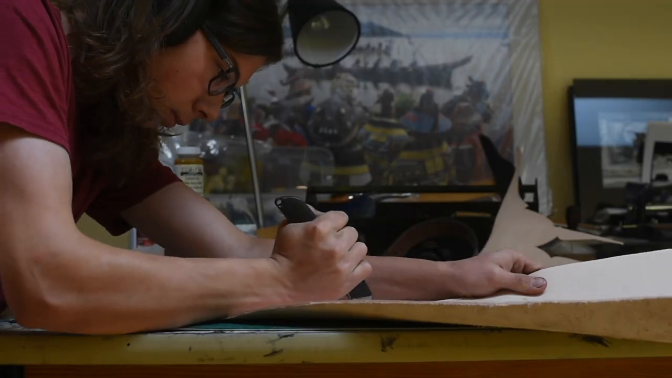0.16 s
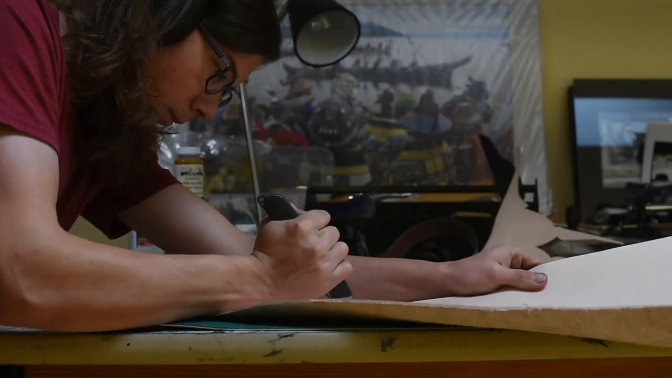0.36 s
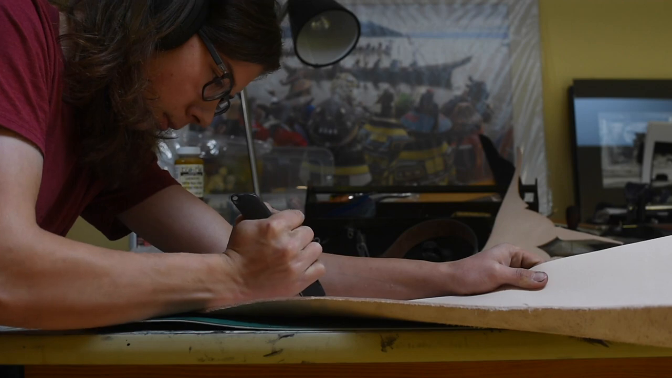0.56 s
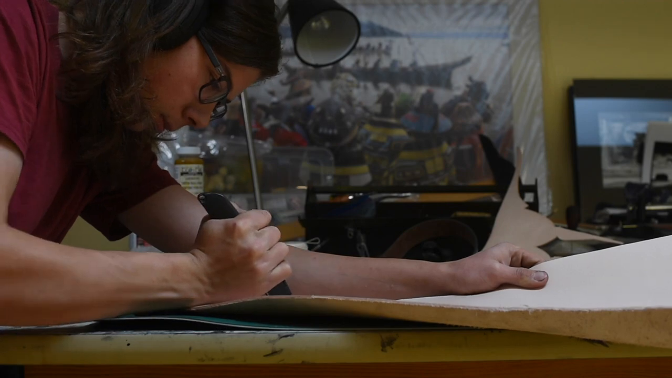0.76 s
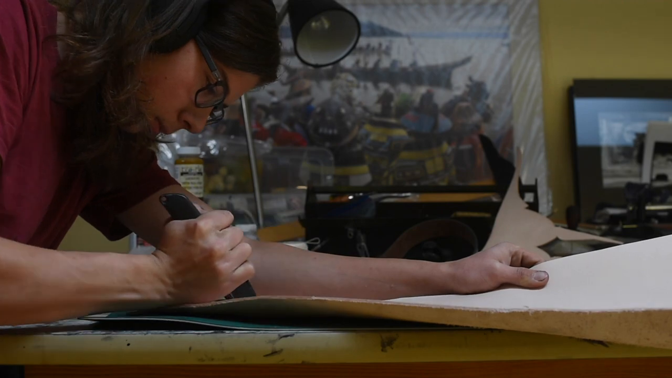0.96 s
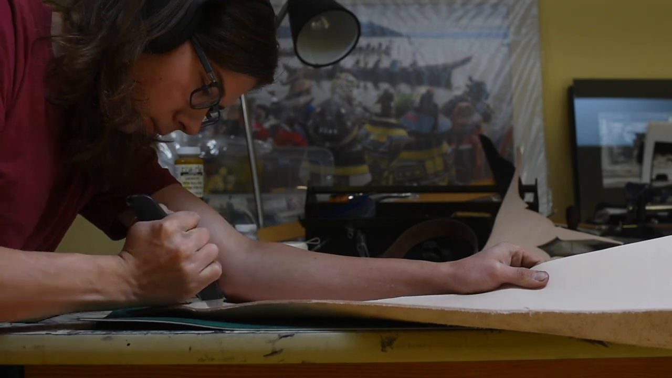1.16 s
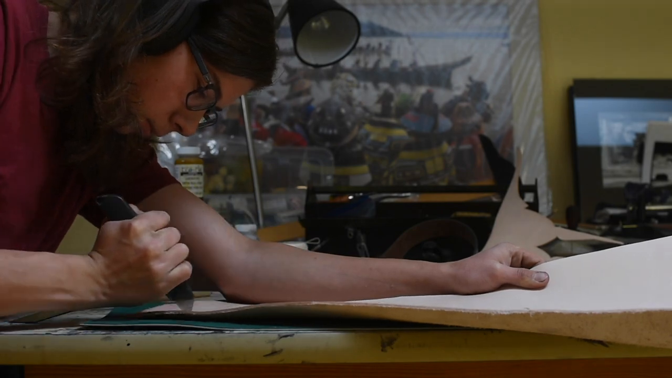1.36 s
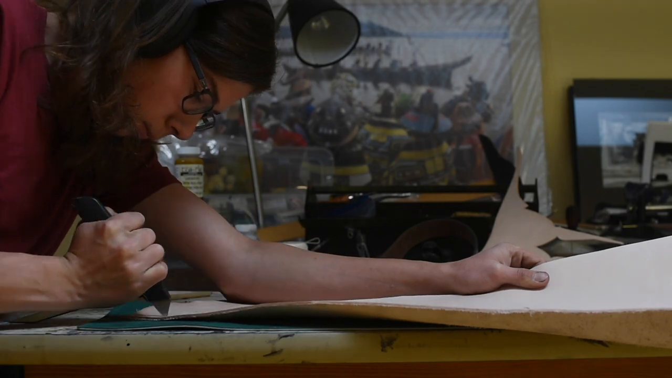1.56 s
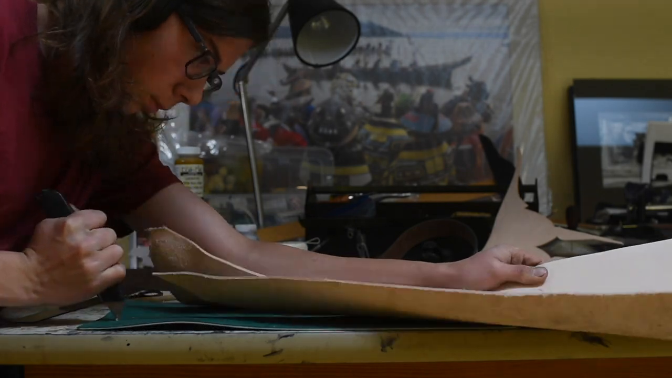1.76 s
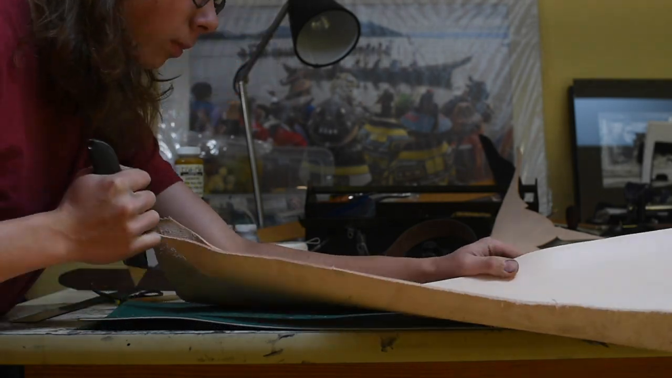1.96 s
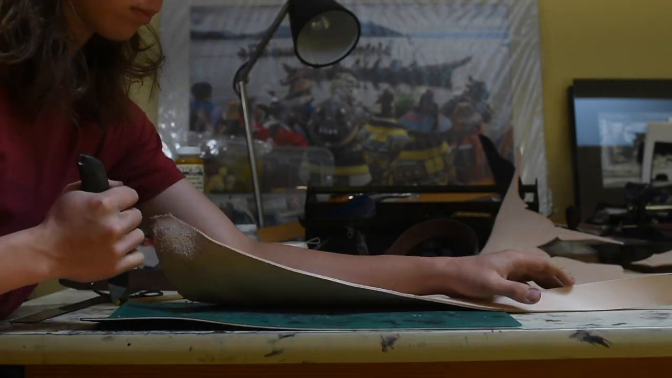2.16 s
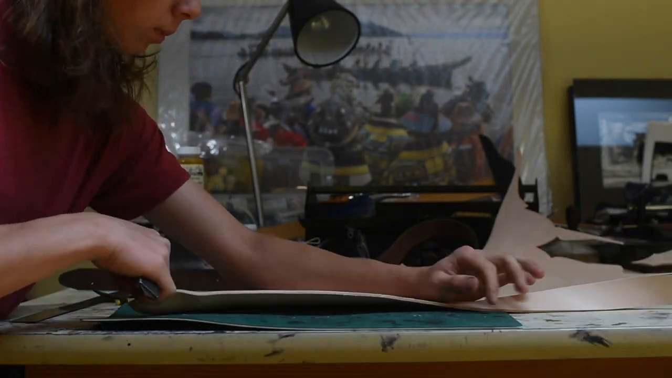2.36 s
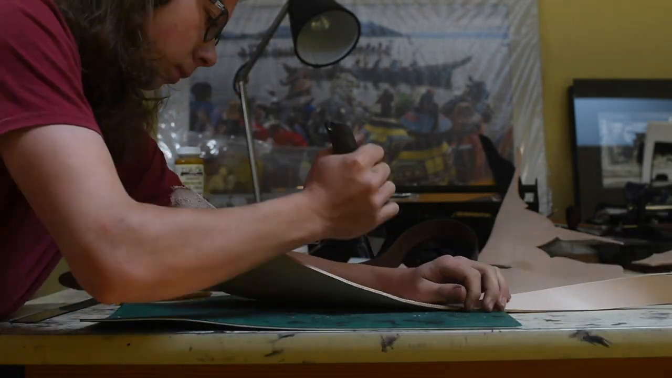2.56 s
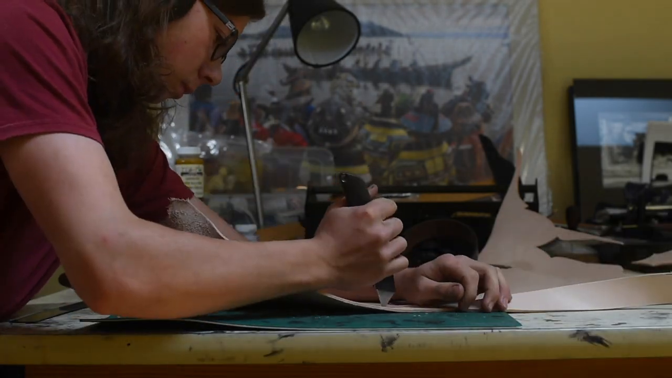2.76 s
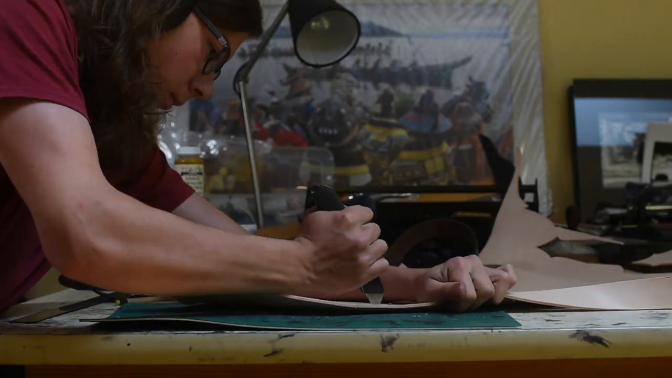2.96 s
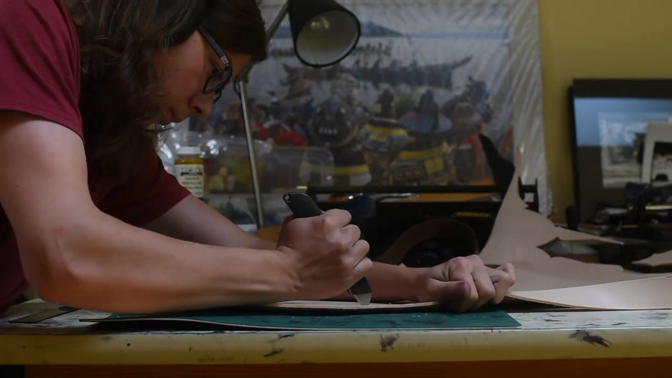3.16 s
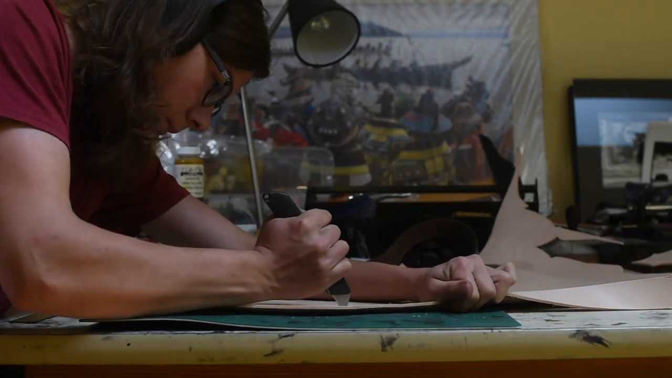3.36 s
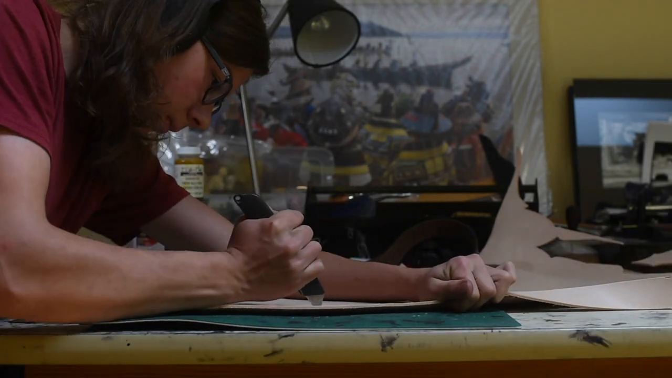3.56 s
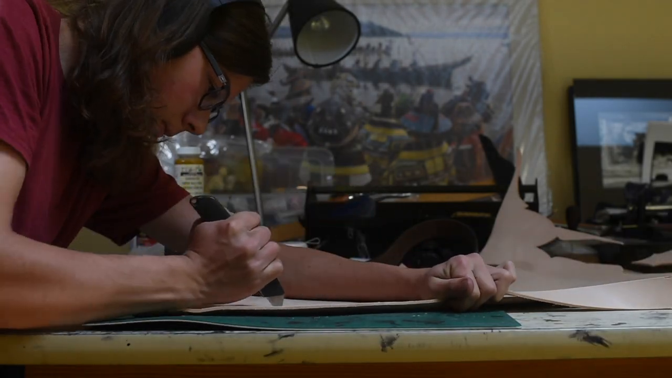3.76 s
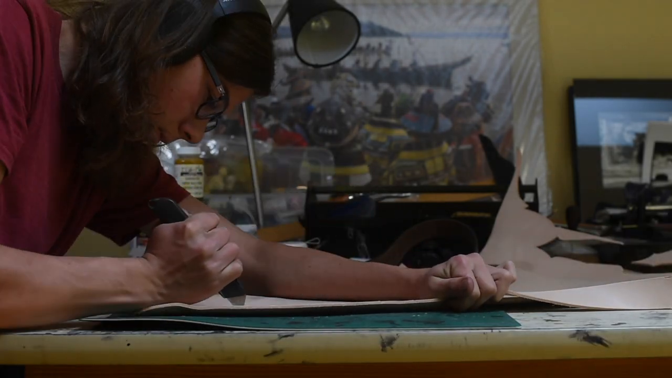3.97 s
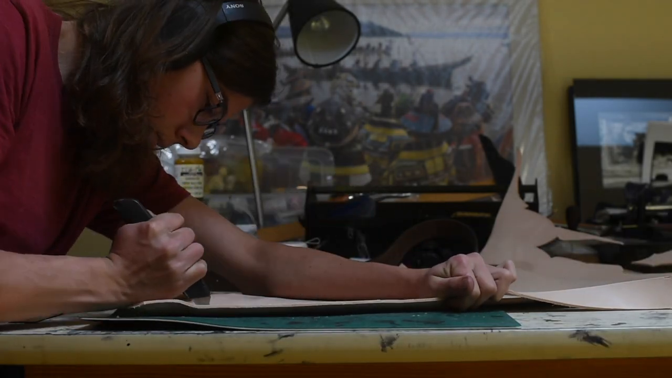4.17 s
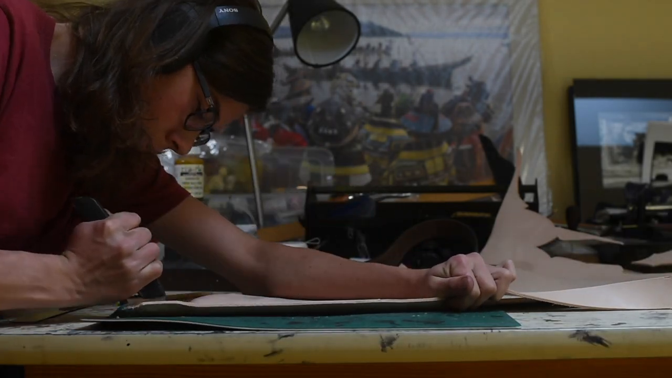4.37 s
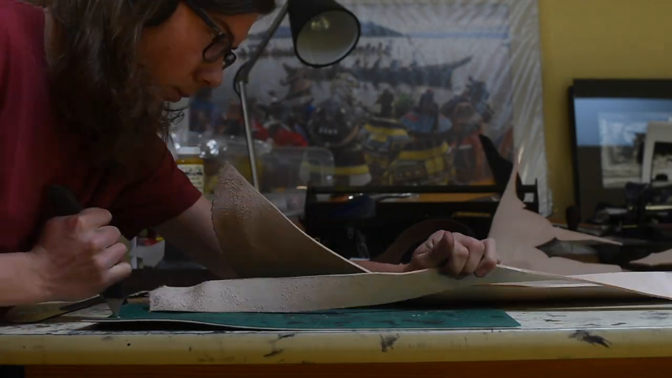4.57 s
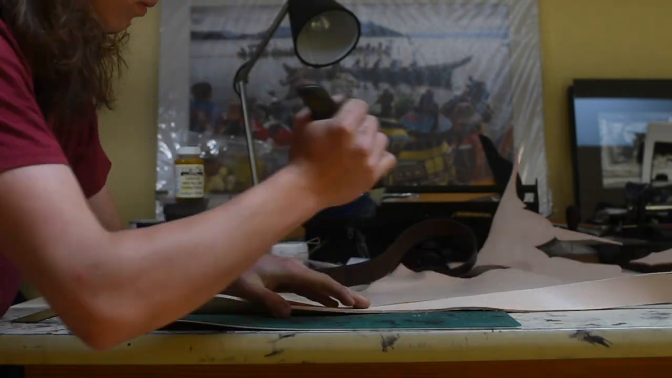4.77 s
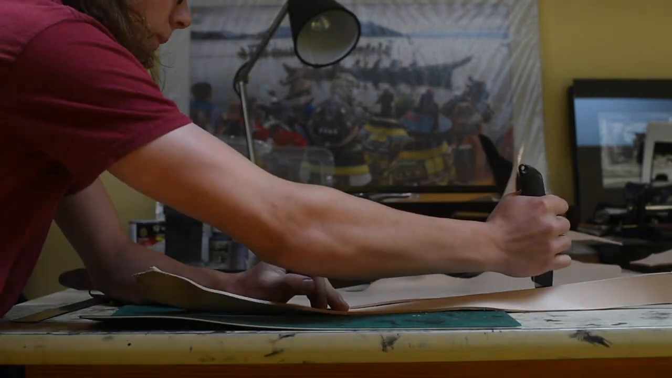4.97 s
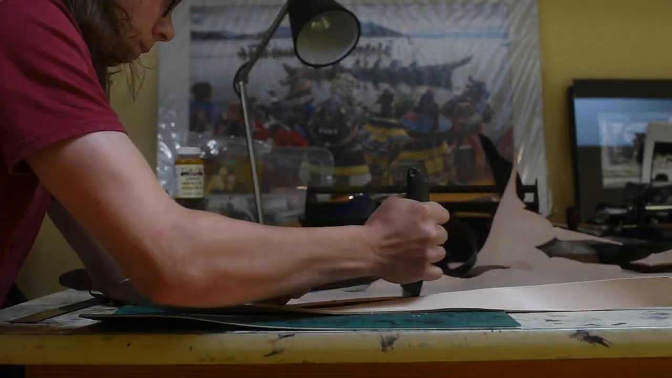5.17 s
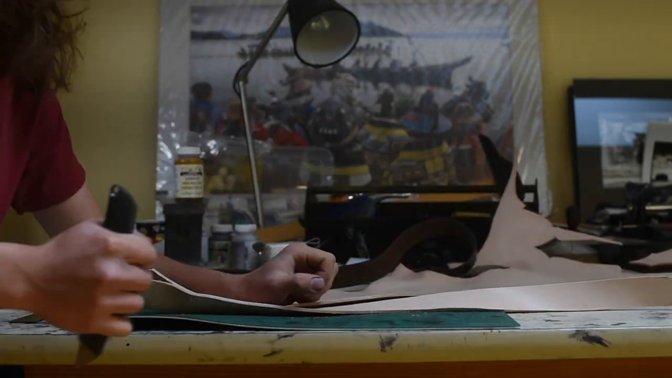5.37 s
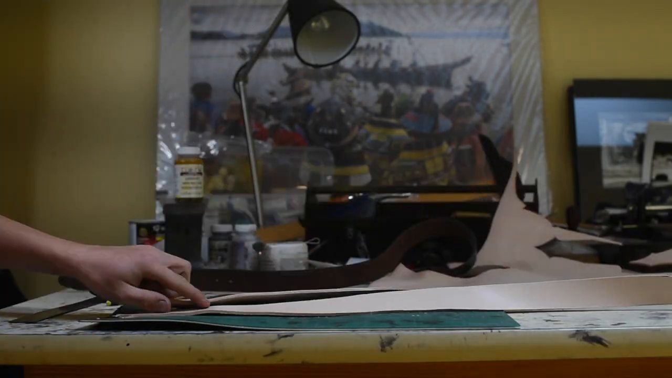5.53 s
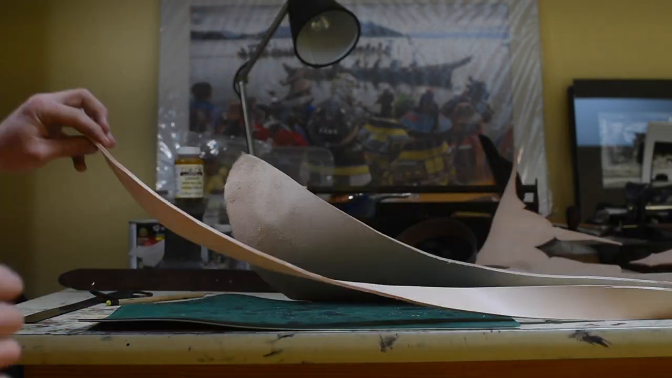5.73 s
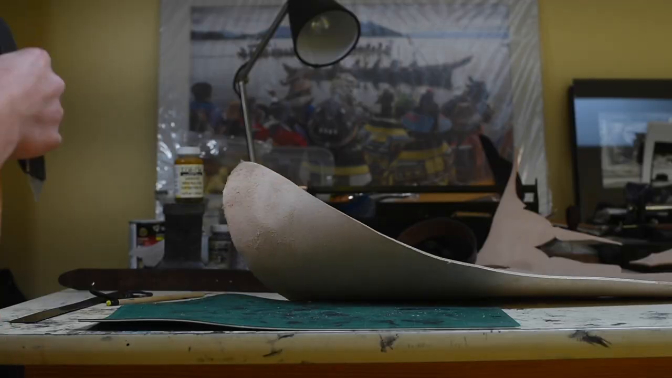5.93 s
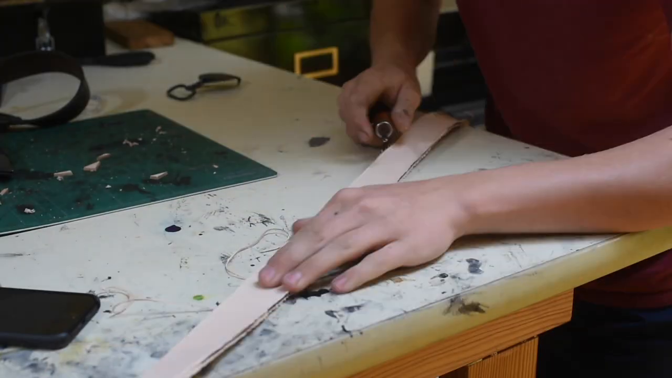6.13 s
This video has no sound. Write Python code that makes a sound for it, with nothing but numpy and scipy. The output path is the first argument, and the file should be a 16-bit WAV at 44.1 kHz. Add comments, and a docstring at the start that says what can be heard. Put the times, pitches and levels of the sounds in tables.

```python
"""Cutting hide on a workbench

A knife is dragged twice through a thick hide; fibres snap in rasping pulls that stick, slip and stall.
Between the cuts the freed strip slaps down and shakes the bench and its tools; afterwards the hide is
shifted and lifted. A fan hums in the small workshop. It ends at a quieter, closer spot with light ticks."""
import sys
import numpy as np
from scipy import signal
from scipy.fft import rfft, irfft, next_fast_len
from scipy.io import wavfile
from scipy.ndimage import uniform_filter1d

SR = 44100
rng = np.random.default_rng(int(sys.argv[2]) if len(sys.argv) > 2 else 0)


def generate_wav(signal):
    """Clip the signal to [-1, 1] and save it as 16-bit WAV at the path in sys.argv[1]."""
    frames = np.transpose(np.atleast_2d(signal))
    scaled = np.clip(frames, -1, 1) * 32767
    pcm = np.round(scaled).astype(np.int16)
    wavfile.write(sys.argv[1], SR, pcm)


N = 277830
TIME = np.arange(N) / SR
MOVE_S = 6.116  # move to the closer spot


def amp(db):
    """Decibels to gain."""
    return 10 ** (np.asarray(db) / 20)


def unit(x):
    """Scales to rms 1."""
    return x / np.sqrt(np.mean(x ** 2) + 1e-20)


def curve(points, hz):
    """Joins (Hz, value) points on a log-frequency axis."""
    f, value = np.transpose(points)
    return np.interp(np.log(hz + 1), np.log(f + 1), value)


def peaks_db(modes, f):
    """Boost from resonances given as (Hz, width Hz, dB)."""
    return sum(db / (1 + (2 * (f - hz) / width) ** 2) for hz, width, db in modes)


def colour(x, db_at):
    """Filters x by a function Hz -> dB; rms 1."""
    return unit(irfft(rfft(x) * amp(db_at(np.fft.rfftfreq(len(x), 1 / SR))), len(x)))


def add(mix, start_s, sound):
    """Mixes a sound in at start_s."""
    part = mix[max(round(start_s * SR), 0):][:len(sound)]
    part += sound[:len(part)]


def bell(t, centre, length):
    """Power of a smooth swell."""
    return np.exp(-np.minimum((2 * (t - centre) / length) ** 2, 60))


def span(start_s, end_s, ramp_samples):
    """Gate with linear ramps."""
    return uniform_filter1d(1. * ((TIME > start_s) & (TIME < end_s)), size=ramp_samples)


def wander(rate_hz):
    """Random drift below rate_hz, rms about 1."""
    knots = colour(rng.standard_normal(4096), lambda f: -10 * np.log10(1 + (f * 4096 / N / rate_hz) ** 4))
    return np.interp(TIME, np.linspace(0, N / SR, len(knots)), knots)


def fibres(size, spread_db):
    """Dense tiny snaps of uneven strength."""
    return rng.standard_normal(size) * amp(spread_db * np.minimum(rng.exponential(1, size), 5))


# Air of the workshop and of the closer spot. Each row: frequency in Hz, relative density in dB.
WORKSHOP_AIR = [(25, -48), (60, -14.5), (120, -21), (170, -10.5), (250, -6), (330, -10), (500, -12),
                (700, -7.5), (1000, -11), (2000, -15), (5000, -18.5), (10000, -23.5), (16000, -27)]
CLOSE_AIR = [(40, -12), (150, -11), (500, -8), (1200, -2), (2500, -5), (5000, -4), (10000, -7),
             (16000, -13)]
# Fan hum, and whine at the closer spot. Each row: frequency in Hz, level in dB.
FAN_HUM = [(237, -82), (479, -73), (546, -84.5), (958, -94.5)]
CLOSE_WHINE = [(1200, -88), (1830, -87), (2401, -83.5)]


def background(during, air, lines, air_db):
    """Soft hiss with slightly wavering tones."""
    t = TIME[during]
    hiss = colour(rng.standard_normal(next_fast_len(len(t))), lambda f: curve(air, f))[:len(t)]
    drift_rad = 0.23 * wander(rate_hz=3.3)[during]
    tones = sum(amp(db) * np.sqrt(2) * np.sin(2 * np.pi * hz * t + drift_rad) for hz, db in lines)
    return amp(air_db) * hiss + tones * amp(1.3 * wander(rate_hz=9.8)[during])


# Hollow ring of the stiff hide. Each row: frequency in Hz, width in Hz, boost in dB.
SHEET_MODES = [(821, 56, 4), (1007, 73, -0.5), (3790, 680, 1)]


def contact(size, thump_db, dull_db):
    """Grainy noise of hide on the thumping bench top; a flatter contact has more body and less edge."""
    body_db = 0.47 * dull_db - 3.5
    edge_db = -0.65 * dull_db - 0.6
    shape = [(30, thump_db - 31), (70, thump_db - 18), (115, thump_db - 27), (190, thump_db),
             (300, thump_db - 2), (430, thump_db / 2 + body_db / 2 - 6.5),
             (600, body_db - 1.5), (980, body_db + 3), (1500, -1.5), (2400, -0.3),
             (3500, 1 + edge_db / 4), (6000, edge_db + 2), (9500, edge_db - 4.5), (16000, edge_db - 8)]
    return colour(fibres(size, spread_db=2.5), lambda f: curve(shape, f) + peaks_db(SHEET_MODES, f))


# Hands on the loose hide. Each row: start in seconds, end in seconds, rustle level in dB.
HANDLING = [(0, 0.032, -60.5), (1.825, 2.154, -71.5), (2.382, 2.95, -79), (4.686, 5.92, -73)]


def handling(knocks_per_s=7):
    """The loose hide rustles faintly, with tiny knocks at random."""
    out = np.zeros(N)
    rustle = contact(N, thump_db=2.5, dull_db=5) * amp(wander(rate_hz=9.3))
    for start, end, db in HANDLING:
        out += amp(db) * rustle * span(start, end, ramp_samples=1500)
        for chance, when, strength, dull in rng.random((24, 4)):
            if chance < knocks_per_s * (end - start) / 24:
                knock_s = start + when * (end - start)
                add(out, *tap(knock_s, db + 7.5 + 5 * strength, length_s=0.0026, dull_db=24 * dull - 8))
    return out


# Blade in the hide. Each row: start in seconds, end in seconds.
IN_HIDE = [(0.28, 1.78), (3.27, 4.52)]
# Pulls from stall to stall. Each row: start in seconds, length in seconds, force in dB.
PULLS = [(0.176, 0.042, -55.5), (0.285, 0.066, -47.5), (0.352, 0.045, -50), (0.432, 0.027, -48.5),
         (0.464, 0.078, -44), (0.561, 0.057, -46.5), (0.651, 0.14, -46), (0.821, 0.049, -47.5),
         (0.879, 0.24, -47), (1.164, 0.079, -47.5), (1.259, 0.16, -49), (1.427, 0.096, -48),
         (1.56, 0.075, -48.5), (1.67, 0.12, -46.5), (3.118, 0.14, -55.5), (3.278, 0.065, -47.5),
         (3.408, 0.12, -48), (3.54, 0.08, -46.5), (3.638, 0.16, -46.5), (3.811, 0.13, -48),
         (3.957, 0.067, -51), (4.042, 0.2, -49.5), (4.252, 0.11, -45.5), (4.408, 0.12, -43)]
# Tough spots. Each row: centre in seconds, force in dB, length in seconds.
SNAGS = [(0.106, -40, 0.027), (0.839, -41, 0.022), (3.714, -43, 0.0075), (4.381, -38, 0.02),
         (4.506, -39, 0.012)]


def blade_force(creep_db=-58, attack_s=0.0034, release_s=0.0036, sag_db_per_s=-5.5):
    """Each pull bites, sticks and slips, tires and stalls; the blade creeps on and bursts through snags."""
    power = amp(creep_db) ** 2 * sum(span(start, end, ramp_samples=800) for start, end in IN_HIDE)
    slip_hz = 31.6 * np.exp(0.4 * wander(rate_hz=25))
    uneven_db = 0.72 * wander(rate_hz=16)
    t = np.arange(SR // 2) / SR
    for start, length, db in PULLS:
        here = slice(round(start * SR), round(start * SR) + len(t))
        slip_db = 1.1 * np.sin(2 * np.pi * np.cumsum(slip_hz[here]) / SR)
        gate = (1 - np.exp(-t / attack_s)) * np.exp(-np.maximum(t - length, 0) / release_s)
        add(power, start, (gate * amp(db + sag_db_per_s * t + slip_db + uneven_db[here])) ** 2)
    snags = sum(amp(db) ** 2 * bell(TIME, centre, length) for centre, db, length in SNAGS)
    return np.sqrt(abs(power + snags))


# The two cuts. Each row: start in seconds, end in seconds.
CUT_TIMES = [(0, 1.9), (3.0, 4.65)]
# Rasp spectrum of each cut. Each row: frequency in Hz, relative density in dB.
FIRST_RASP = [(60, -47), (115, -45), (175, -6.5), (400, -14), (520, -10.5), (800, -1.5), (1150, -9.5),
              (1900, 6), (3100, -4), (4500, 1), (7500, -2), (11500, -5), (16000, -9)]
SECOND_RASP = [(60, -44), (115, -35), (175, 0.5), (400, -4.5), (600, 4), (800, 5), (1300, -2.5),
               (2000, 0.5), (2500, -3.5), (4500, -1), (6500, -2), (11000, -3), (16000, -7.5)]
# Colour along each cut. Each row: time in seconds, body gain in dB, fizz gain in dB.
FIRST_TONE = [(0.1, -1.5, -5.5), (0.33, 2, -2), (0.7, 3.5, -1.5), (0.85, 7, 2.5), (1.2, 7, 3),
              (1.55, 5, -0.5), (1.77, 3, -1)]
SECOND_TONE = [(3.141, -10, -7), (3.45, -7.5, -6), (3.75, -2.5, 1), (4.15, -1.5, 2), (4.35, -7.5, -6.5),
               (4.52, -4.5, -5.5)]
# Resonances of blade and hide. Each row: strongest moment in seconds, spread in seconds,
# frequency in Hz, width in Hz, relative level in dB.
BLADE_MODES = [(0.6, 1.03, 3610, 63, -7.5), (1.15, 1.26, 1655, 32, -6.5), (1.16, 0.57, 2750, 200, -10.5),
               (0.77, 0.2, 3700, 92, -5.5), (0.42, 0.43, 4640, 170, -21), (3.83, 0.35, 2980, 100, -7.5),
               (3.86, 0.22, 3400, 50, -18), (4.07, 0.29, 1830, 320, -14), (4.25, 0.18, 1140, 150, -15.5),
               (4.47, 0.12, 5800, 500, -14)]


def cut(start, end, force, spectrum, tone, gain_db, tough_per_s=110, tough_db=21.5):
    """Fibres part in surges, tough ones tick; resonances of blade and hide change along the cut."""
    during = (TIME >= start) & (TIME < end)
    t = TIME[during]
    force = force[during] * amp(0.86 * wander(rate_hz=250)[during])  # small catches
    size = next_fast_len(len(t))
    f = np.fft.rfftfreq(size, 1 / SR)
    ticks = amp(tough_db) * rng.standard_normal(size) * (rng.random(size) < tough_per_s / SR)
    snaps = rfft(fibres(size, spread_db=2.0) + ticks)
    rasp = snaps * amp(curve(spectrum, f))
    low = 1 / (1 + (f / 1300) ** 4)
    high = 1 - 1 / (1 + (f / 5000) ** 4)
    bands = irfft(rasp * np.array([low, 1 - low - high, high]), size)[:, :len(t)] / irfft(rasp, size).std()
    # The hide is uneven, so the colour keeps shifting.
    body, middle, fizz = [band * amp(2.2 * wander(rate_hz=26)[during]) for band in bands]
    tone_s, body_db, fizz_db = np.transpose(tone)
    bite = (force / amp(-39.0) + 0.044) ** 0.52  # a harder surge is brighter
    sound = body * amp(np.interp(t, tone_s, body_db)) + middle
    sound += fizz * amp(np.interp(t, tone_s, fizz_db)) * bite
    for centre, length, hz, width, db in BLADE_MODES:
        if start < centre < end:
            note = unit(irfft(snaps / (1 + ((f - hz) / width) ** 2), size))[:len(t)]
            grip_db = 2.0 * wander(rate_hz=56)[during] - 1.2  # the blade's grip varies
            sound += amp(db + grip_db) * np.sqrt(bell(t, centre, length)) * note
    return start, amp(gain_db) * force * sound


# Rips and creaks. Each row: centre in seconds, level in dB, rise and decay time in seconds.
RIPS = [(0.198, -54.5, 0.022), (1.772, -30, 0.0033), (2.141, -50, 0.0079), (6.0, -44.5, 0.0027)]


def rip(centre_s, db, length_s):
    """Fibres at the cut edge give way in a short swell."""
    t = np.arange(-4096, 4096) / SR
    shape = [(60, -48.5), (200, -17), (900, -17.5), (1600, -7.5), (2400, 2.0), (3700, -10.5),
             (4800, -14), (9000, -21.5), (16000, -25.5)]
    tearing = colour(fibres(len(t), spread_db=-1.0), lambda f: curve(shape, f))
    return centre_s + t[0], amp(db) * tearing * np.exp(-abs(t) / length_s)


# Light knocks. Each row: start in seconds, relative level in dB, decay time in seconds, dullness in dB.
TAPS = [(1.915, -54.5, 0.0078, 5), (2.041, -53.5, 0.0075, 17.5), (2.334, -43, 0.0056, 19),
        (2.414, -54, 0.0055, 13), (2.466, -53, 0.0038, 2), (4.708, -57.5, 0.017, 8),
        (4.887, -53, 0.0025, 4), (4.927, -47, 0.0036, 8), (4.971, -54.5, 0.0085, 25),
        (5.103, -46.5, 0.005, 24), (5.137, -51.5, 0.0037, -3), (5.429, -46.5, 0.015, 8.5),
        (5.768, -49, 0.0083, 12), (6.138, -47.5, 0.0019, -15), (6.244, -49.5, 0.0013, -15)]


def tap(start_s, db, length_s, dull_db):
    """Knife or hide knocks on the bench; a longer contact also starts more softly."""
    t = np.arange(4096) / SR
    envelope = np.exp(-t / length_s) * (1 - np.exp(-t / (0.36 * length_s)))
    return start_s, amp(db + 5.5) * contact(len(t), thump_db=-14.5, dull_db=dull_db) * envelope


# The strip lands. Each row: start in seconds, relative level in dB, contact time in seconds,
# treble corner in Hz, treble slope in dB per octave, bass gain in dB.
SLAPS = [(2.2186, -23.5, 0.02, 2780, -9, -0.5), (2.2305, -12.5, 0.0028, 6720, -15, 1),
         (2.3066, -17.5, 0.003, 2210, -33, 0)]
# Slap spectrum. Each row: frequency in Hz, relative level in dB.
SLAP_BODY = [(20, -52.5), (50, -37), (110, -29.5), (170, -8.5), (260, -13.5), (450, -11.5), (620, -3.5),
             (830, -5), (1200, -6), (2000, -2.5), (4000, -5), (6000, -1), (7200, -3.5), (8000, -1.5),
             (16000, 2.5)]
# Resonances under the slaps. Each row: frequency in Hz, width in Hz, boost in dB.
SLAP_MODES = [(596, 65, 6), (806, 72, 5.5), (1136, 50, 5), (1547, 90, 6.5), (1830, 100, 1), (2740, 100, 4),
              (3100, 50, 8.5), (5860, 320, 6.5), (7250, 49, 9.5)]


def slap(start_s, db, length_s, corner_hz, slope_db_per_octave, bass_db):
    """The flat strip hits; a softer part of it makes a duller blow."""
    t = np.arange(4096) / SR
    f = abs(np.fft.fftfreq(len(t), 1 / SR))
    gain_db = curve(SLAP_BODY, f) + peaks_db(SLAP_MODES, f)
    gain_db += slope_db_per_octave * np.log2(np.maximum(f / corner_hz, 1))
    gain_db += bass_db / (1 + (f / 600) ** 2)
    log_gain = np.log(amp(np.maximum(gain_db, -80)))
    response = np.fft.ifft(np.exp(signal.hilbert(log_gain).conj())).real  # rings only after the blow
    patter = rng.standard_normal(len(t)) * np.exp(-t / length_s)
    patter[0] += 3.5  # first touch
    blow = signal.fftconvolve(patter, response)[:len(t)]
    return start_s, amp(db) * blow * np.sqrt(length_s * SR / 2) / np.linalg.norm(blow)


# Metal tools and bench top shaken by the slaps, and the woody knock of a hand on the bench.
# Each row: frequency in Hz, level in dB, t60 in seconds.
TOOL_MODES = [(3106, -64, 0.65), (3560, -54, 0.55), (6541, -67, 0.7), (7730, -66.5, 0.7), (9020, -63, 0.7),
              (9075, -63, 0.75)]
BENCH_MODES = [(66, -75, 0.38), (88, -65, 0.44), (165.6, -46.5, 0.13), (190, -49.5, 0.11)]
HAND_KNOCK_MODES = [(187, -47.5, 0.11), (255, -42, 0.12), (425, -45, 0.056)]


def ring(start_s, modes, rise_s=0.0018):
    """Modes of something struck or shaken build up briefly and die freely."""
    t = np.arange(SR) / SR
    ringing = sum(amp(db - 60 * t / t60) * np.sin(2 * np.pi * hz * t) for hz, db, t60 in modes)
    return start_s, (1 - np.exp(-t / rise_s)) * ringing


# Slides. Each row: centre in seconds, level in dB, length in seconds, dullness in dB, thump in dB.
RUBS = [(2.485, -53.5, 0.02, 6, -17), (2.86, -59.5, 0.0087, 7, -19), (2.925, -61, 0.022, 7, -11),
        (4.847, -44.5, 0.017, 5.5, 1), (5.175, -55.5, 0.047, -3.5, -5), (5.215, -48, 0.016, -3, 3),
        (5.255, -47, 0.033, 2.5, 5), (5.523, -56, 0.013, 21, -31), (5.57, -57.5, 0.015, 23, -27),
        (5.685, -62.5, 0.019, 60, 23), (5.736, -59.5, 0.029, -5, -18), (5.875, -62, 0.031, 21, -8),
        (6.181, -63, 0.028, -8, 1), (6.297, -56.5, 0.01, -6, 4)]


def rub(centre_s, db, length_s, dull_db, thump_db):
    """The hide slides and flexes under the hands; the noise swells and fades."""
    t = np.arange(-8192, 8192) / SR
    return centre_s + t[0], amp(db) * contact(len(t), thump_db, dull_db) * np.sqrt(bell(t, 0, length_s))


# Workshop decay. Each row: frequency in Hz, base t60 in seconds (scaled by t60_factor).
ROOM_DECAY = [(100, 0.26), (500, 0.081), (2000, 0.066), (6000, 0.067), (16000, 0.067)]


def reflections(t60_factor, echoes_per_s=4000):
    """Sparse echoes, each band dying at its own speed; the cluttered room returns less bass."""
    echoes = rng.choice([-1., 1.], SR // 2) * (rng.random(SR // 2) < echoes_per_s / SR)
    hz, t, bands = signal.stft(echoes, SR, nperseg=256)
    bass_db = -5 / (1 + (hz[:, None] / 450) ** 2)
    decay_db = -60 * t / (t60_factor * curve(ROOM_DECAY, hz)[:, None])
    response = signal.istft(bands * amp(bass_db + decay_db), SR, nperseg=256)[1]
    return response / np.linalg.norm(response)


def workshop(x, direct_db, near_db, far_db):
    """Direct sound, quick reflections off bench and walls, and a faint longer tail."""
    response = amp(near_db) * reflections(t60_factor=0.84) + amp(far_db) * reflections(t60_factor=6.6)
    return amp(direct_db) * x + signal.fftconvolve(x, np.r_[np.zeros(40), response])[:N]


def scene():
    """Everything at the bench passes the room, except the last close contacts."""
    bench, close, force = handling(), np.zeros(N), blade_force()
    add(bench, *cut(*CUT_TIMES[0], force, FIRST_RASP, FIRST_TONE, gain_db=-3.5))
    add(bench, *cut(*CUT_TIMES[1], force, SECOND_RASP, SECOND_TONE, gain_db=-1.17))
    add(bench, *ring(start_s=SLAPS[1][0], modes=TOOL_MODES))
    add(bench, *ring(start_s=SLAPS[2][0], modes=BENCH_MODES))
    add(bench, *ring(start_s=4.83, modes=HAND_KNOCK_MODES))
    for source, rows in ((slap, SLAPS), (rip, RIPS), (tap, TAPS), (rub, RUBS)):
        for row in rows:
            add(bench if row[0] < MOVE_S else close, *source(*row))
    air = np.r_[background(TIME < MOVE_S, WORKSHOP_AIR, FAN_HUM, air_db=-70),
                background(TIME >= MOVE_S, CLOSE_AIR, CLOSE_WHINE, air_db=-75.5)]
    return (workshop(bench, direct_db=-1.5, near_db=-2.5, far_db=-25) + close + air)[None]


def record(dry):
    """Steep low-pass at the top of the treble."""
    lowpass = signal.firwin(511, cutoff=15950, window=("kaiser", 9), fs=SR)
    return signal.oaconvolve(dry, lowpass[None], "same")


dry = scene()
out = record(dry)
generate_wav(out)
```